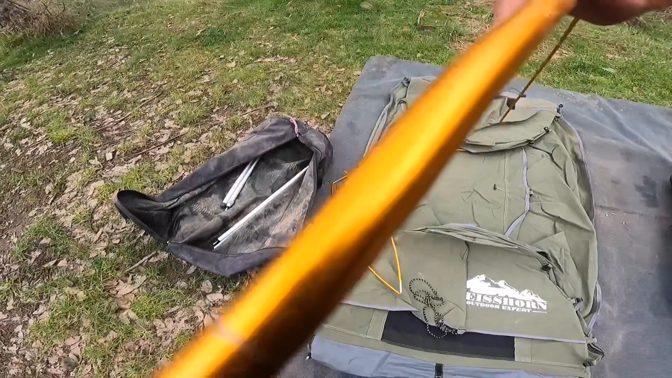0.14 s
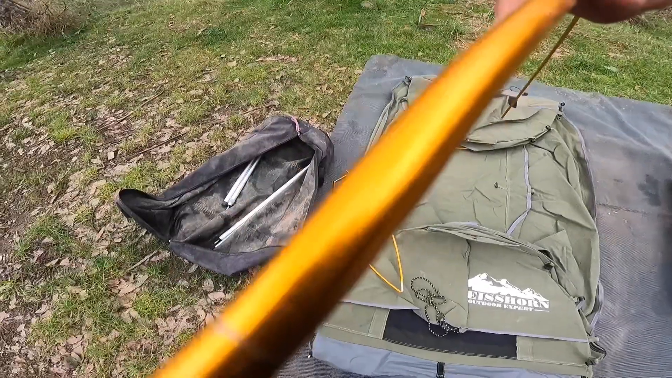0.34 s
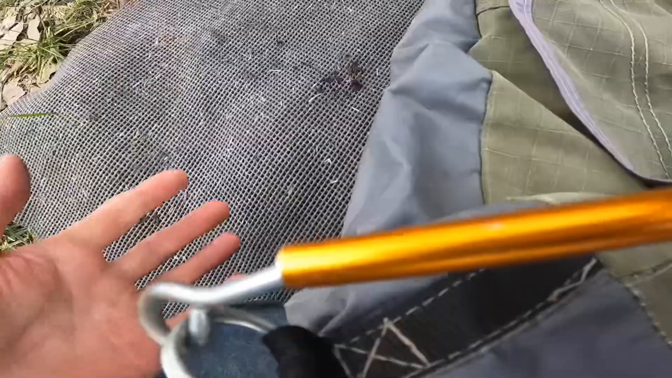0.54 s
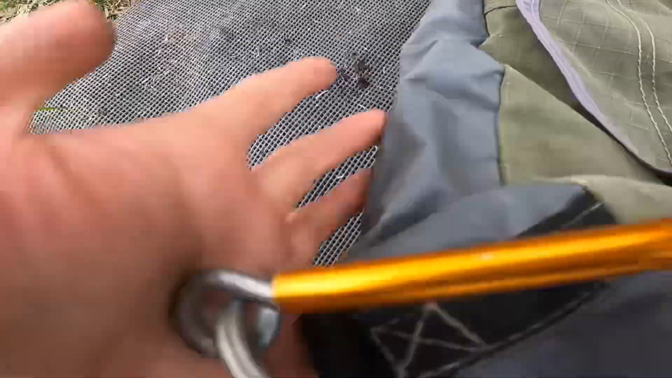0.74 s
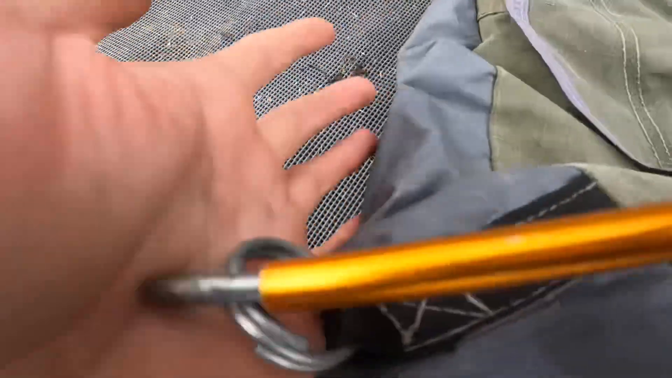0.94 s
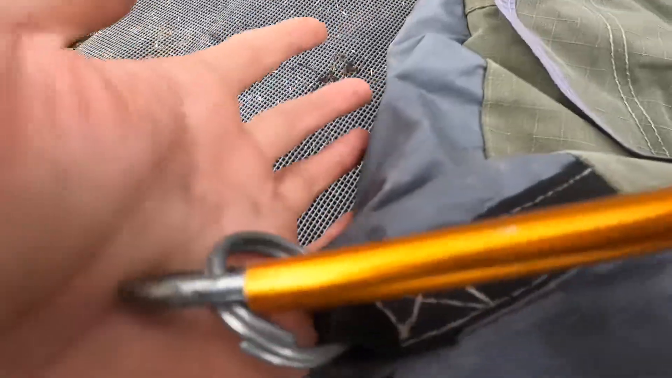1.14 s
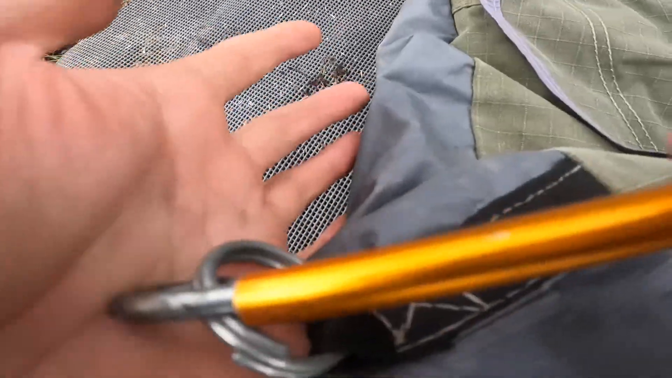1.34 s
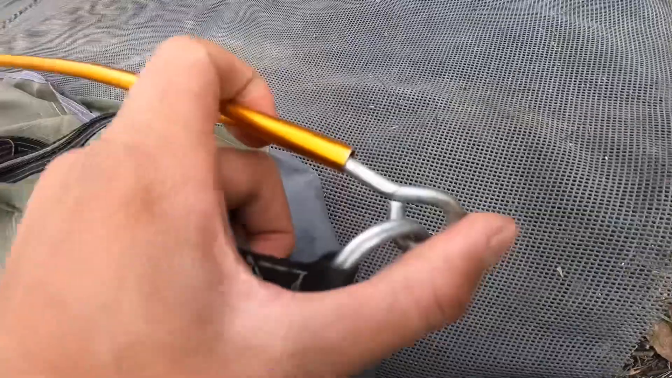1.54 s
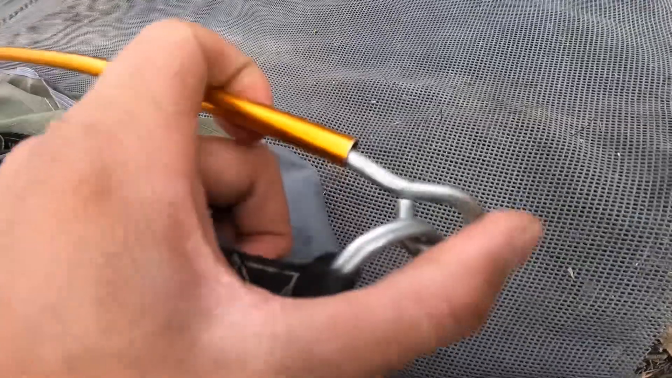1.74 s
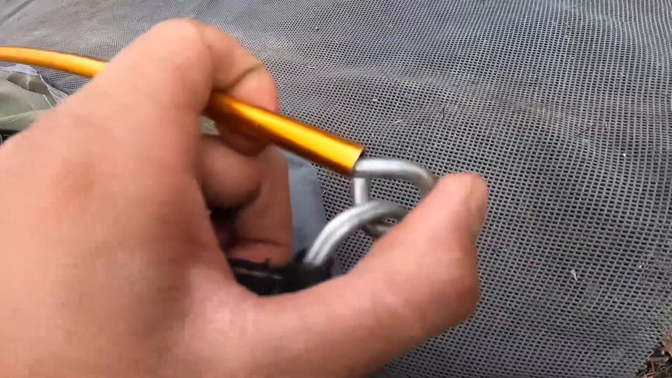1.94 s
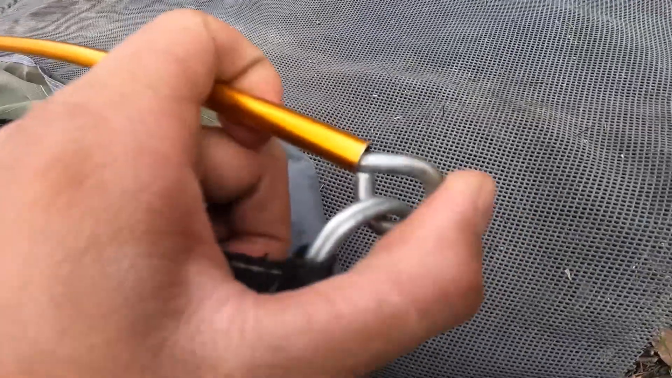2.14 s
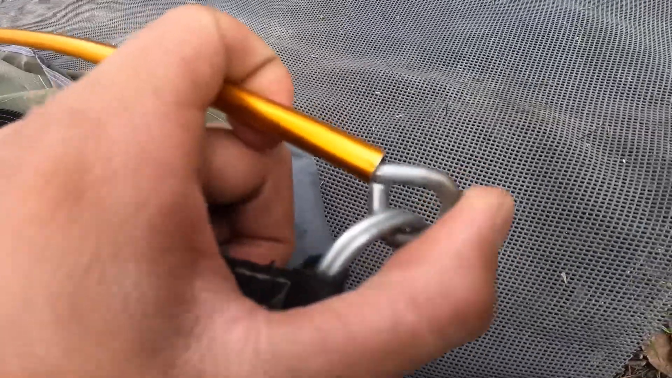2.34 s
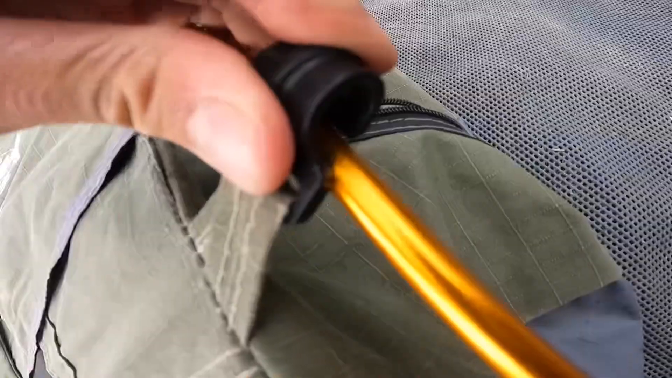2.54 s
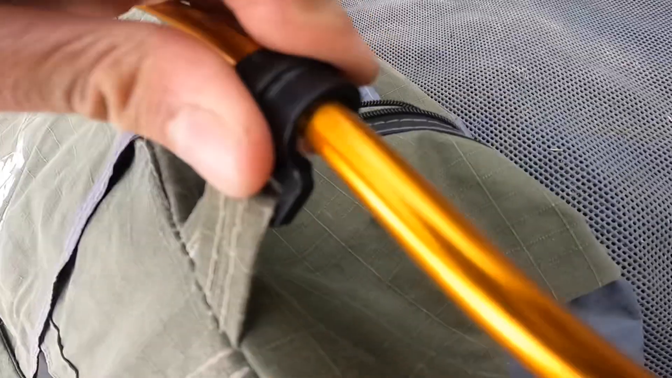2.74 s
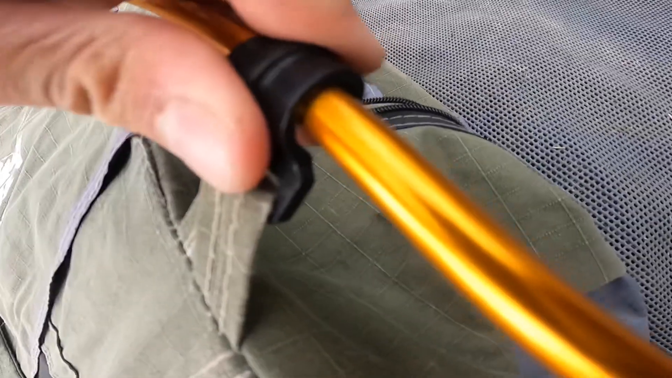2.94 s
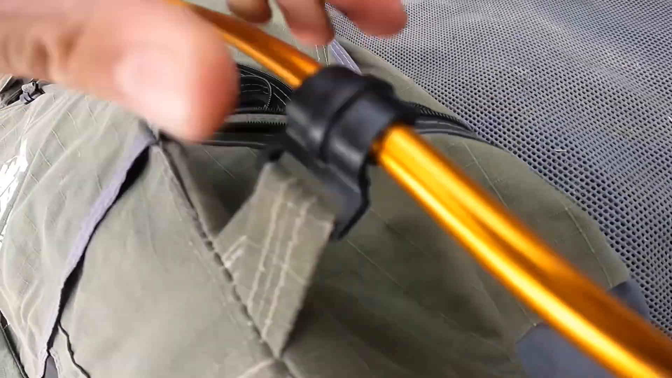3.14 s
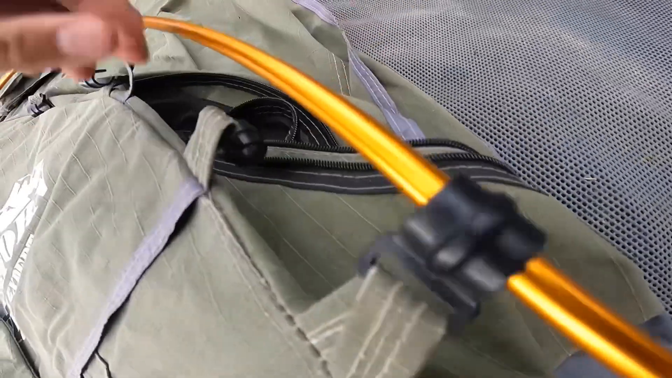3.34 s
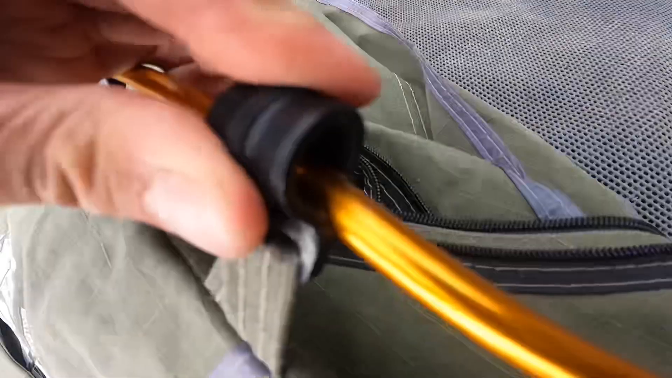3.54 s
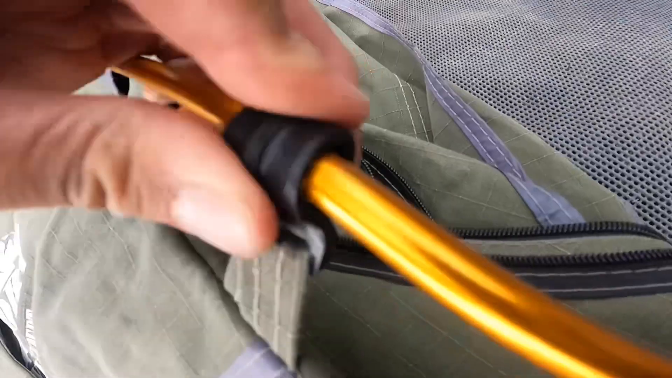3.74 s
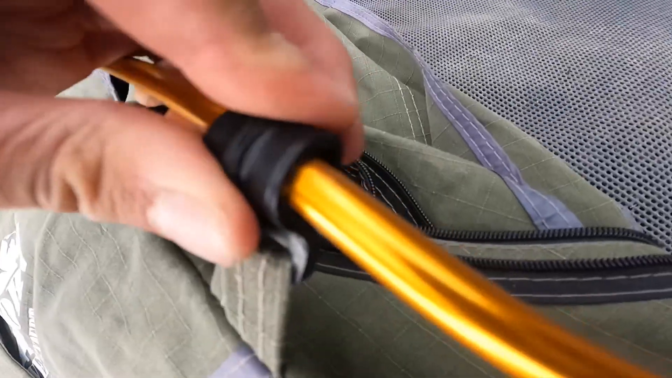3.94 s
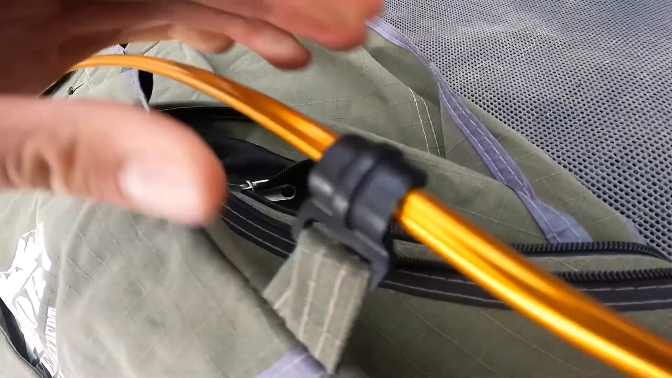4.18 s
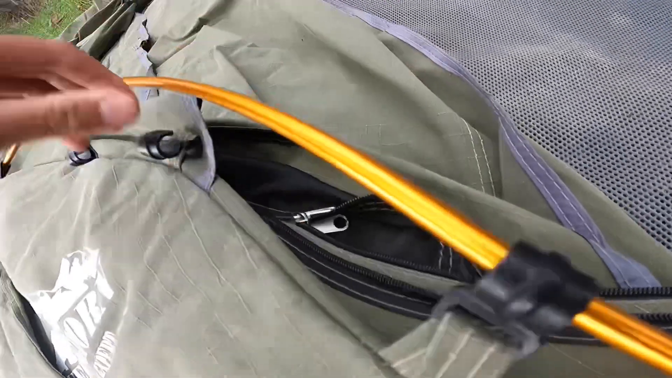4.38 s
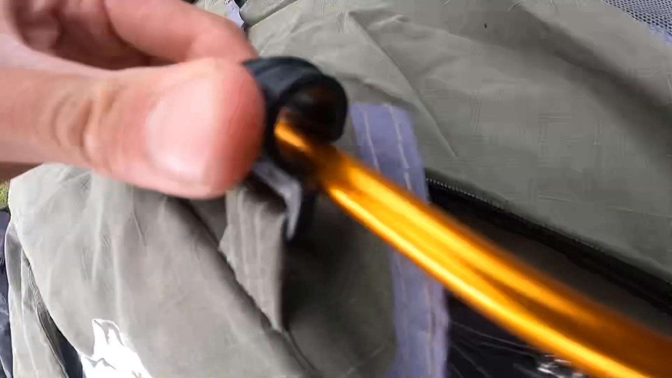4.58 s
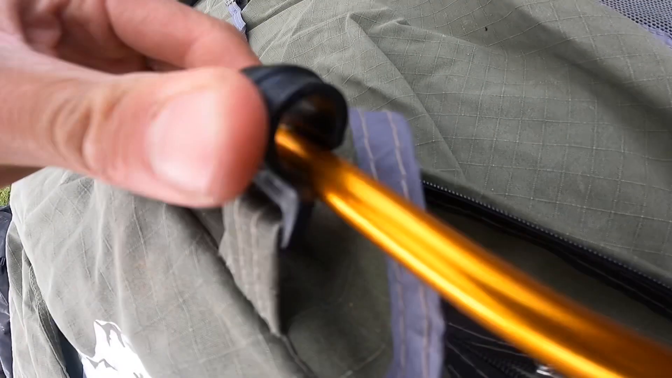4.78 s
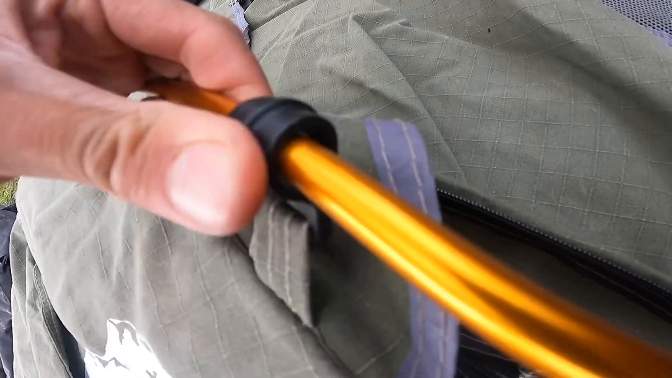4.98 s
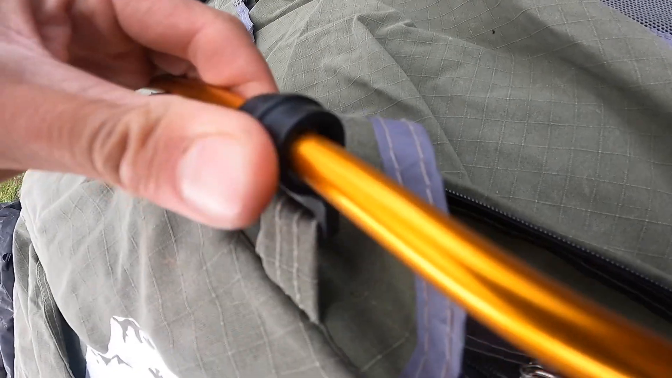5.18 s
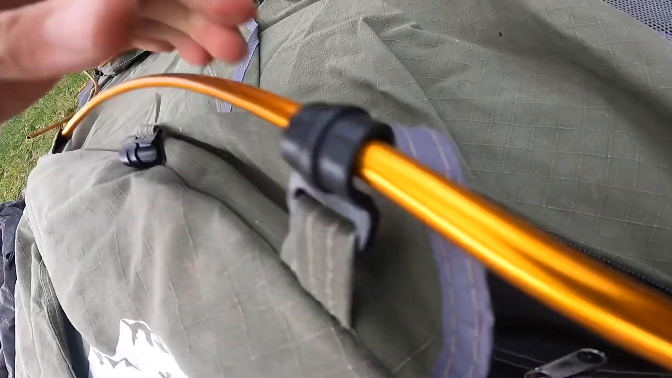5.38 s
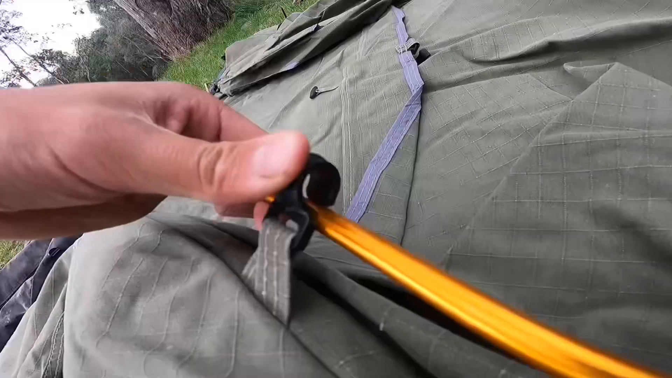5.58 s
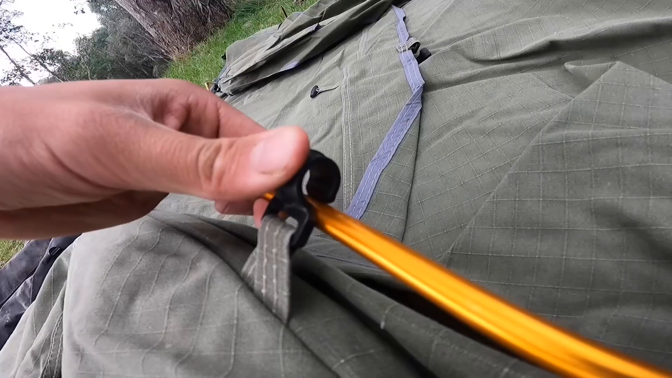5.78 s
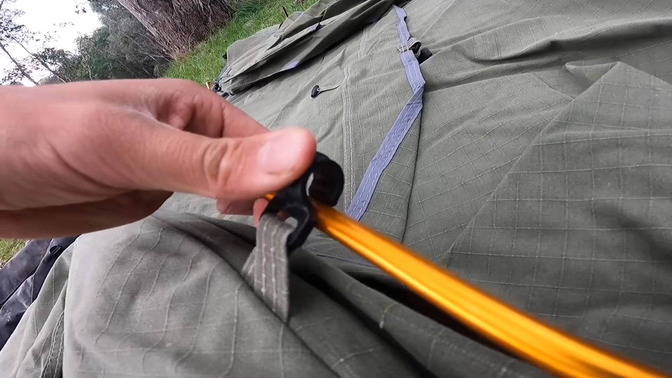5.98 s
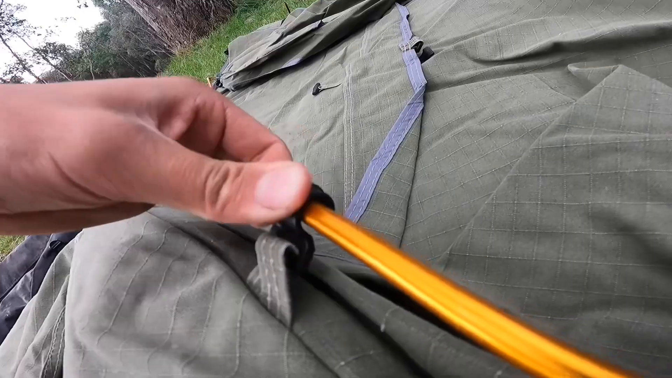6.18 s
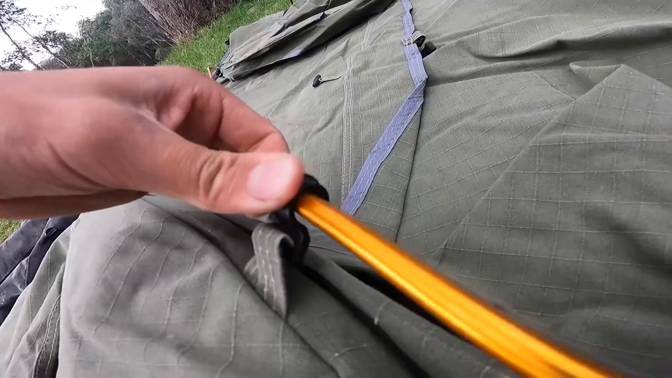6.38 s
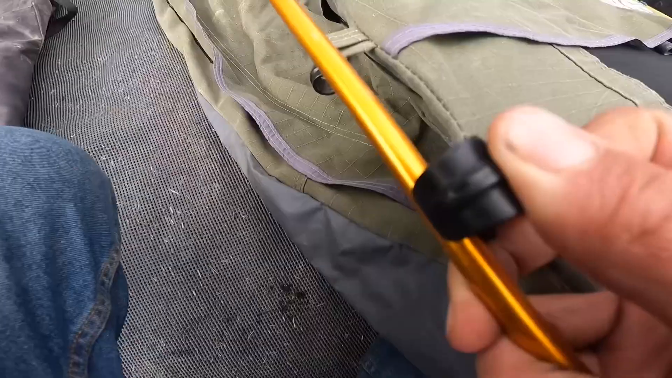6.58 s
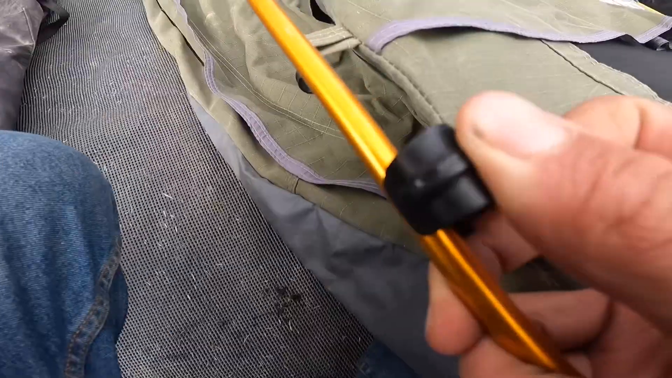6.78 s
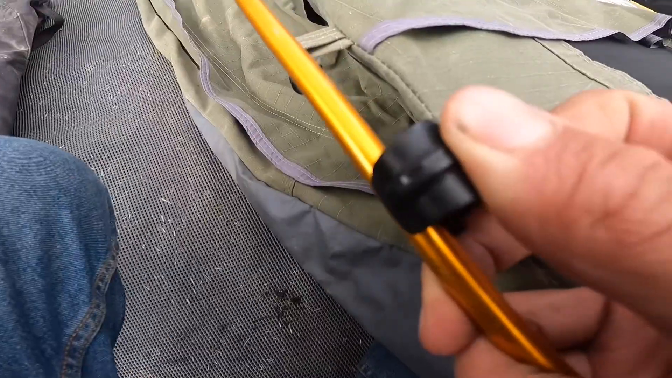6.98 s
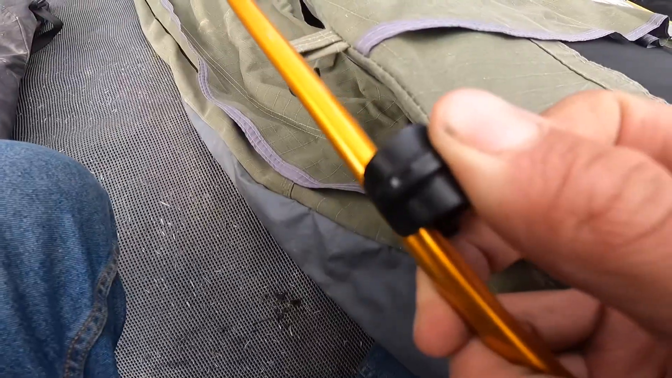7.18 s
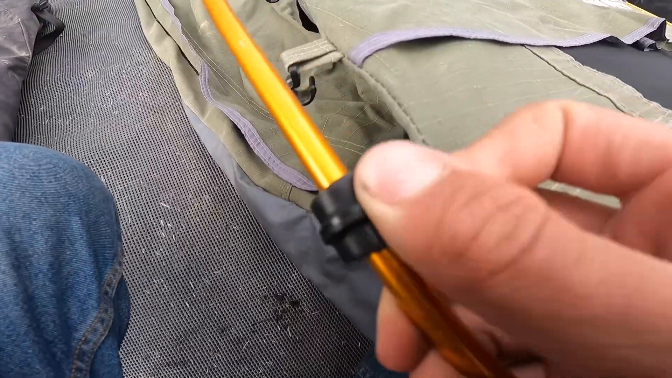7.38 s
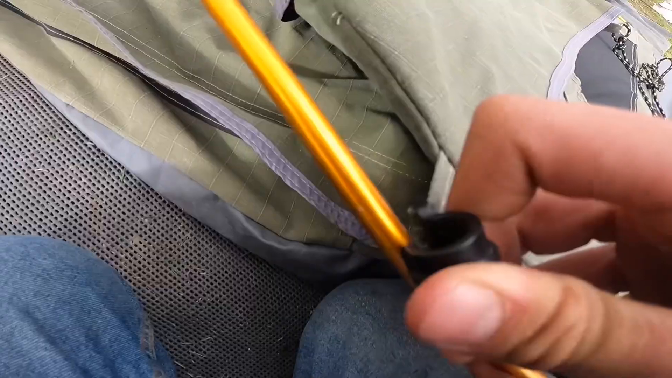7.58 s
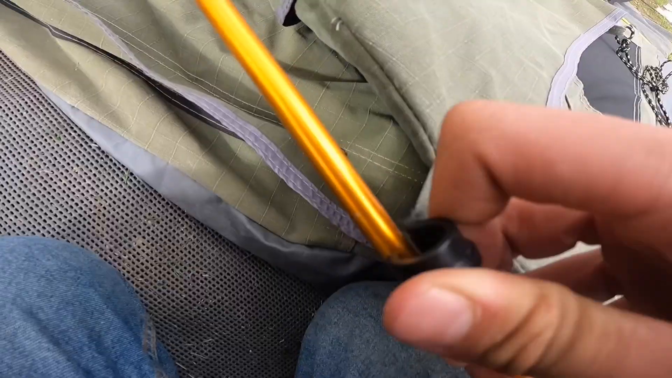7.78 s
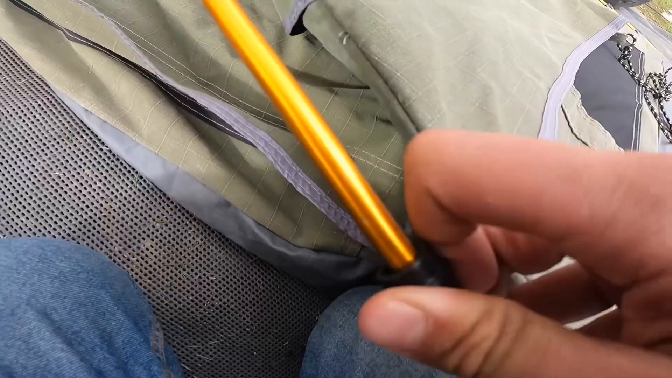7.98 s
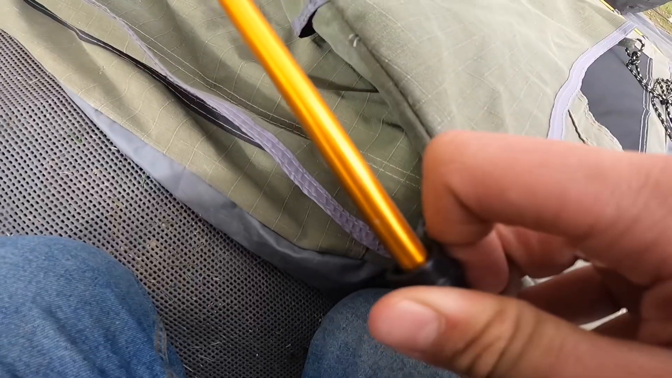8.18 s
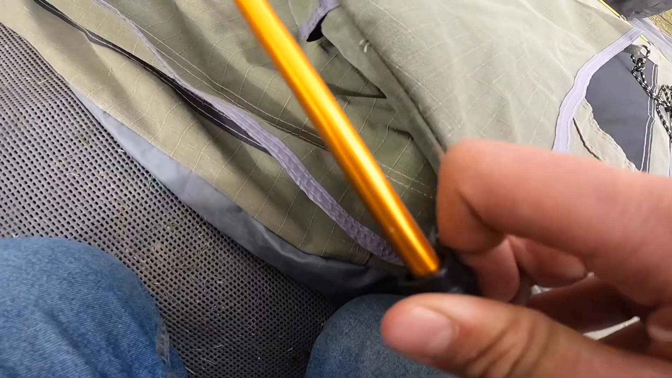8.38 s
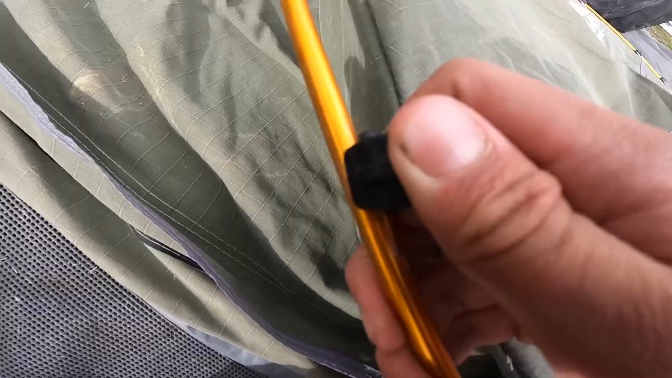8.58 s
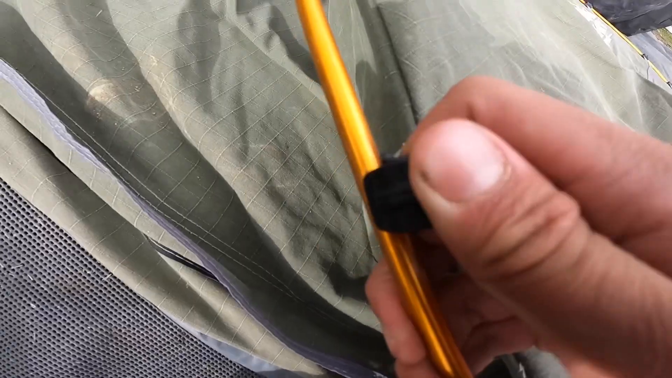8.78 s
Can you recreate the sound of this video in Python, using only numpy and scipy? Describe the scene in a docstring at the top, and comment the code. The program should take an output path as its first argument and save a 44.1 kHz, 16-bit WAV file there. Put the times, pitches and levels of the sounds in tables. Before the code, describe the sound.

Close, dry outdoor sound with a faint, soft hiss, its tone shifting at brief fades about every second. At 0 to 0.1 s a low, muffled bump of pole and canvas. Around 0.85 to 1.06 s a thump and sharp click, with a steel ring bouncing in tiny bright clinks, ending in a smaller click. At 1.98 s a moderate metallic click. At 2.84 s a duller snap with a canvas thud; at 3.86 s a harder, brighter plastic crack on hollow tube. At 4.99 s a very loud snap, followed by a weak tick at 5.46 s. At 6.30 s another extremely hard, short crack with a punchy thump, the background ducking for a moment. At 7.48 s a crisp, lighter snap, and at 8.01 s a click with a low thud and small rattle. Only hiss remains until the end at about 8.9 s.

```python
"""Pitching a tent on a lawn

Ten short passages close to the microphone, with a brief fade between them. Soft outdoor hiss is shaped noise.
The bowed pole thumps as decaying sines, the canvas as deep noise; a steel ring clinks on a pin as decaying modes.
Light taps and snaps of plastic hooks on the aluminium pole are noise bursts through tube resonances; noise swells
for a few milliseconds into each. The recorder's limiter ducks everything after the hardest snaps."""
import sys
import numpy as np
from scipy import signal
from scipy.fft import rfft, irfft
from scipy.io import wavfile
from scipy.ndimage import minimum_filter1d

SR = 44100
rng = np.random.default_rng(int(sys.argv[2]) if len(sys.argv) > 2 else 0)


def master_out(mix):
    """Clip the mix to full scale and print it as 16-bit PCM to the path in sys.argv[1]."""
    frames = np.transpose(np.atleast_2d(mix))
    ceiling = np.clip(frames, -1, 1)
    pcm = np.round(ceiling * 32767).astype(np.int16)
    wavfile.write(sys.argv[1], SR, pcm)


N = 388962
TIME = np.arange(N) / SR


def undb(db):
    """Decibels to gain."""
    return 10 ** (np.asarray(db) / 20)


def unit(x):
    """Scale to rms 1."""
    return x / np.sqrt(np.mean(x ** 2))


def bins_hz(size):
    """Frequencies of a real transform, kept off zero."""
    return np.maximum(np.arange(size // 2 + 1) * SR / size, 1)


def shape_db(points, hz):
    """A spectrum joined by straight lines on a log-frequency axis."""
    f, db = np.transpose(points)
    return np.interp(np.log(hz), np.log(f), db)


def hump(hz, centre_hz, octaves):
    """A broad resonance, 1 at its centre."""
    return 1 / (1 + (np.log2(hz / centre_hz) / octaves) ** 2)


def bass_shelf(hz, corner_hz):
    """1 well below the corner, 0 well above it."""
    return 1 / (1 + (hz / corner_hz) ** 4)


def rolloff_db(hz, corner_hz, depth_db):
    """Treble falls steeply above the corner, down to a shelf."""
    return 10 * np.log10(1 / (1 + (hz / corner_hz) ** 16) + undb(depth_db) ** 2)


def colour(x, db):
    """Causal minimum-phase filter shaped by the gain at each bin; keeps the energy of white noise."""
    cepstrum = irfft(np.log(unit(undb(db))))
    # fold the cepstrum onto positive time
    cepstrum[1:len(x) // 2] *= 2
    cepstrum[len(x) // 2 + 1:] = 0
    return irfft(rfft(x) * np.exp(rfft(cepstrum)))


def fade(t, t60_s):
    """Free decay, 60 dB down after t60."""
    return np.exp(-np.log(1000) * t / t60_s)


def add(out, start_s, sound, pan_db=0):
    """Mix a sound in at a time; pan is left minus right."""
    start = int(round(start_s * SR))
    sound = sound * undb(np.array([[pan_db], [-pan_db]]) / 2)
    first, last = max(start, 0), min(start + sound.shape[1], N)
    out[:, first:last] += sound[:, first - start:last - start]


# Passages. Each row: start in seconds, end in seconds, hiss in dB, its bass in dB, peak in Hz, hollow in Hz,
# change of the hiss after the passage's first snap in dB.
PASSAGES = [(-.05, .546, 3, -3.5, 2030, 730, 0), (.541, 1.526, 2.3, .5, 378, 2270, -5),
            (1.54, 2.521, -0.55, -1, 1004, 428, -1.2), (2.541, 3.523, -.5, 1, 710, 1660, -1),
            (3.542, 4.536, -0.76, 2.5, 656, 330, -3), (4.539, 5.519, 1, 0.5, 903, 330, -6),
            (5.54, 6.529, 1.2, -3.5, 5040, 316, -3), (6.539, 7.509, 2.5, -4, 1740, 2990, -4),
            (7.54, 8.54, 1.5, -2.5, 331, 2900, -3), (8.539, 8.9, 0.5, -3, 1300, 2900, 0)]
# Spectrum of outdoor air. Each row: frequency in Hz, relative density in dB per Hz.
AIR_SPECTRUM = [(25, -6), (70, -4.5), (120, -1.5), (175, 2), (260, -5.5), (400, -11), (650, -15),
                (1000, -15.5), (2500, -20.5), (4300, -23.5), (7500, -33.5), (12000, -35), (14000, -58),
                (16000, -68)]
# Spells of dull hiss. Each row: start in seconds, end in seconds, treble change in dB.
DULL_SPELLS = [(-.05, .546, -12), (1.006, 1.53, -10.5), (2.53, 3.53, -15.5)]
AIR_DB, AIR_PAN_DB = -43, 0.77
PEAK_DB, HOLLOW_DB, HISS_CORNER_HZ, SETTLE_S = 2.5, -3.5, 8270, 0.22


def air(bass_hz=170, side_db=-5, spread_hz=1000, flutter_db=0.92, treble_hz=4700, bright_db=1.5):
    """Outdoor hiss: noise coloured by the microphone's place, settling after a snap; bass nearly alike in both ears."""
    out, size = np.zeros((2, N)), 65536
    t, hz = np.arange(size) / SR, bins_hz(size)
    for start_s, end_s, db, bass_db, peak_hz, hollow_hz, settle_db in PASSAGES:
        # nearby ground and canvas lift one region and hollow out another
        place_db = PEAK_DB * hump(hz, peak_hz, 0.2) + HOLLOW_DB * hump(hz, hollow_hz, 0.17)
        ends_db = bass_db * bass_shelf(hz, bass_hz) + rolloff_db(hz, HISS_CORNER_HZ, -13)
        gain = unit(undb(shape_db(AIR_SPECTRUM, hz))) * undb(AIR_DB + db + place_db + ends_db)
        side_gain = gain * undb(side_db) * hz / (hz + spread_hz)
        mid = irfft(rfft(rng.standard_normal(size)) * gain)
        side = irfft(rfft(rng.standard_normal(size)) * side_gain)
        snap_s = min((s for s, *_ in SNAP_EVENTS if s > start_s), default=end_s)
        settled = np.clip((start_s + t - snap_s) / SETTLE_S, 0, 1)
        hiss = np.array([mid + side, mid - side]) * undb(settle_db * settled)
        add(out, start_s, hiss * (t < end_s - start_s), AIR_PAN_DB)
    treble_db = bright_db + sum(db * ((TIME > start_s) & (TIME < end_s)) for start_s, end_s, db in DULL_SPELLS)
    treble = signal.sosfiltfilt(signal.butter(6, treble_hz, "high", fs=SR, output="sos"), out)
    flutter = np.interp(TIME, np.linspace(0, TIME[-1], 128), rng.standard_normal(128))
    return (out + (undb(treble_db) - 1) * treble) * undb(flutter_db * flutter)


# Hands tug at the tent. Each row: start in seconds, recoil in dB, recoil in Hz, recoil t60 in seconds,
# canvas flap in dB.
TUG_EVENTS = [(0, -25, 46, .13, -22), (0.013, -7.5, 48, 0.069, -27.5), (.039, -20, 141, 0.16, -27),
              (.069, -15.5, 122, .063, -27.5), (.647, -19.5, 200, .02, -45), (.852, -6, 150, 0.083, -16.5),
              (0.93, -29, 70.8, .06, -25), (3.25, -50, 59, .1, -35.5), (4.299, -46, 45.8, .1, -35.5),
              (8.023, -8, 169, 0.028, -25.5)]
# Spectrum of flapping canvas. Each row: frequency in Hz, relative density in dB per Hz.
FLAP_SPECTRUM = [(12, -21.5), (34, -1), (70, 0.5), (130, -7), (260, -7.5), (450, -28.5), (1200, -55.5)]
# the harder the canvas flaps, the longer: t60 at 0 dB, and the drop in level that halves it
FLAP_T60_S, FLAP_HALVES_DB = 0.35, 50


def thumps(rise_s=0.00079, pan_db=-1.6, slow_hz=110, quick_share=.45, overtone=2.7, overtone_db=-13,
           side_db=-11):
    """After a snap or tug the bowed pole swings in two bending modes; the canvas flaps on, deepest folds longest."""
    out, t, hz = np.zeros((2, N)), np.arange(SR) / SR, bins_hz(SR)
    deep = signal.butter(2, slow_hz, fs=SR, output="sos")
    for start_s, *_, db, pitch_hz, t60_s, flap_db in SNAP_EVENTS + TUG_EVENTS:
        phase = 2 * np.pi * pitch_hz * t
        swing = np.sin(phase) * fade(t, t60_s)
        swing = swing + undb(overtone_db) * np.sin(overtone * phase) * fade(t, t60_s / 2)
        flap_t60_s = FLAP_T60_S * 2 ** (flap_db / FLAP_HALVES_DB)
        slow_fade = fade(t, flap_t60_s)
        cloth = np.array([colour(rng.standard_normal(SR), shape_db(FLAP_SPECTRUM, hz)) for _ in range(2)])
        folds = signal.sosfiltfilt(deep, cloth)
        flaps = folds * slow_fade + (cloth - folds) * fade(t, flap_t60_s * quick_share)
        mid, side = (unit(flap) * np.sqrt(np.mean(slow_fade ** 2)) for flap in flaps)
        canvas = mid + undb(side_db) * np.array([side, -side])
        thump = undb(db) * swing + undb(flap_db) * canvas
        add(out, start_s, thump * (1 - np.exp(-t / rise_s)), pan_db)
    return out


# Steel ring hits the pin. Each row: start in seconds, level in dB, upper modes in dB,
# ring length as a share of the free ring.
CLINK_EVENTS = [(.861, -26, -0.5, 0.88), (.872, -21, -0.5, 0.79), (.896, -29, -2.5, 1.6),
                (0.9163, -26.5, -5.5, 1.3), (.952, -20, 11.5, 0.44), (.9635, -20.5, -20, 1),
                (0.99, -25.5, -14, 0.34), (1.0578, -30, 11, 0.78)]
# Modes of steel ring and pin. Each row: frequency in Hz, level in dB, free t60 in seconds.
STEEL_MODES = [(3456, -20, .05), (4613, -18, .03), (6618, -1, .075), (6850, -7, .035), (7135, -3, .06),
               (10890, -21, .03)]


def clinks(tick_db=-5, tick_t60_s=0.0083, upper_hz=6900, pan_db=2.5):
    """The steel ring bounces on the pin: decaying modes, damped more or less by the palm, with a noise tick."""
    out, t = np.zeros((2, N)), np.arange(SR // 4) / SR
    tick_band = signal.butter(2, [5300, 8800], "band", fs=SR, output="sos")
    for start_s, db, upper_db, free in CLINK_EVENTS:
        ring = np.zeros(len(t))
        for hz, mode_db, t60_s in STEEL_MODES:
            gain = undb(mode_db + upper_db * (hz > upper_hz))
            struck_hz = hz * (1 + 0.00054 * rng.standard_normal())
            ring += gain * fade(t, t60_s * free) * np.sin(2 * np.pi * struck_hz * t)
        tick = unit(signal.sosfilt(tick_band, rng.standard_normal(len(t)))) * fade(t, tick_t60_s)
        add(out, start_s, undb(db) * (ring + undb(tick_db) * tick), pan_db)
    return out


def band_noise(force, db, even=0):
    """Grainy contact force through a body's spectrum; a clean break (even near 1) drives all pitches alike."""
    grains = rfft(force * rng.choice([-1, 1], len(force)))
    grains = irfft(grains / (abs(grains) + 1e-9) ** np.clip(even, 0, 1))
    return unit(colour(grains, db)) * np.sqrt(np.mean(force ** 2))


# Spectrum of plastic cracking on aluminium tube. Each row: frequency in Hz, relative density in dB per Hz.
CRACK_SPECTRUM = [(150, 0), (600, -10), (1800, -7), (2900, -1.5), (6500, -3), (8000, -5), (10500, -5),
                  (13000, -8), (16000, -21.5)]
# Resonances of hook and tube, heard in the swell and rattle around a hit. Each row: frequency in Hz,
# width in Hz, level in dB.
TUBE_MODES = [(650, 1400, -4), (1200, 2400, -11.5), (2410, 140, -0.5), (2970, 210, 0), (3640, 330, -2),
              (4210, 120, -2), (6890, 1500, -17), (7750, 190, -9), (11400, 2700, -17)]
SWELL_S, RATTLE_S = 0.0078, 0.0063


def contact(decay_s, body_db, ring_hz, ring_db, top_hz, swell_db, rattle_db, side_db=-12, lag_s=9e-6,
            body_hz=1500, wobble_db=3):
    """Resonant noise swells unevenly into a crack, then rattles away; returns lead-in seconds and sound."""
    size = 8192
    t, hz = (np.arange(size) - size // 4) / SR, bins_hz(size)
    tube_power = sum(undb(db) ** 2 / (1 + ((hz - f * f / hz) / width) ** 2) ** 2 for f, width, db in TUBE_MODES)
    tube_db = 10 * np.log10(tube_power)
    crack = (t >= 0) * np.exp(-abs(t) / decay_s)
    wobble = undb(wobble_db * np.interp(t, np.linspace(t[0], t[-1], 100), rng.standard_normal(100)))
    swell = undb(swell_db) * np.exp(-abs(t) / SWELL_S)
    rattle = undb(rattle_db) * np.exp(-abs(t) / RATTLE_S)
    around = wobble * np.where(t < 0, swell, rattle)
    top_db = rolloff_db(hz, top_hz, -21.5)
    tilt_db = body_db * bass_shelf(hz, body_hz) + ring_db * hump(hz, ring_hz, .25)
    crack_db = shape_db(CRACK_SPECTRUM, hz) + tilt_db + top_db
    around_db = tube_db + tilt_db / 2 + top_db
    mid, side = (band_noise(crack, crack_db, even=0.42) + band_noise(around, around_db) for _ in range(2))
    # the hands work nearer the right port, so the left hears them a little later
    late = irfft(rfft(mid) * np.exp(-2j * np.pi * hz * lag_s))
    return -t[0], np.array([late + undb(side_db) * side, mid - undb(side_db) * side])


# Light taps on the tube, and the bright treble edge of one snap. Each row: start in seconds, level in dB,
# decay in seconds, low body in dB, resonance in Hz, resonance in dB.
TAP_EVENTS = [(.07, -38, .002, 8, 3300, 19), (0.8518, -20, 0.0036, 12, 1600, 16.5),
              (0.861, -19, 0.0071, 15, 3400, -4.5), (0.8792, -24.5, .006, -0.5, 3390, -0.5),
              (.8959, -27.5, 0.0031, 7.5, 1187, 13), (0.9591, -23.5, .006, -1.5, 3400, -0.5),
              (2.8346, -19, 0.0023, -20, 13560, 32), (3.8657, -8, 0.0019, 4.5, 7100, 15.5),
              (3.885, -26.5, 0.0041, -6, 3420, 16.5), (5.003, -15.5, 0.0017, 4.5, 4600, 4.5),
              (6.317, -26, 0.0011, -15, 3160, 6.5), (7.951, -33.5, .0012, -6.5, 4240, 10),
              (8.0254, -20, 0.0027, -1.5, 3600, 4), (8.066, -37, .0025, 1.5, 3500, 15)]
# swell and rattle are relative to the tap, the bounce to the first hit
TAP_SWELL_DB, TAP_RATTLE_DB, TAP_CORNER_HZ, BOUNCE_S, BOUNCE_DB = -22.5, -15, 10600, 0.015, -19.5


def taps(pan_db=1):
    """Light taps on the tube and one snap's treble edge, each bouncing once; each hit with a little swell and rattle."""
    out = np.zeros((2, N))
    for start_s, db, decay_s, body_db, ring_hz, ring_db in TAP_EVENTS:
        for delay_s, loss_db in ((0, 0), (BOUNCE_S, BOUNCE_DB)):
            lead_s, sound = contact(decay_s, body_db, ring_hz, ring_db, TAP_CORNER_HZ, TAP_SWELL_DB,
                                    TAP_RATTLE_DB)
            add(out, start_s + delay_s - lead_s, undb(db + loss_db) * sound, pan_db)
    return out


# Pin or hook snaps home and jolts the pole. Each row: start in seconds, level in dB, low body in dB,
# resonance in Hz, resonance in dB, treble corner in Hz, swell in dB, left minus right in dB,
# recoil in dB, recoil in Hz, recoil t60 in seconds, canvas flap in dB.
SNAP_EVENTS = [(0.8713, -3, 8.5, 3120, 2.5, 12500, -28, -2.5, -7, 69, .07, -27),
               (1.0579, -16, 4, 3220, 7, 8550, -42, -2.5, -19.5, 70, .046, -35),
               (1.9848, -10, 1, 6580, 11.5, 10510, -30.5, 1.5, -15, 105, .045, -28.5),
               (2.8353, -9, -2.5, 4720, 7.5, 5280, -15.5, 0.5, -6.5, 114.3, 0.069, -16),
               (3.8615, 1, 4, 3610, 7.5, 13000, -19.5, -3.5, -1.5, 84, 0.073, -13),
               (4.9931, 13.5, -0.5, 6200, 5.5, 11600, -24, 2.5, 1.5, 80, .035, -11.5),
               (5.4603, -16.5, 1, 3740, 2.5, 7100, -55, -1.5, -27, 100, 0.018, -35),
               (6.2978, 12.5, -5, 5950, 8, 11160, -35, -1.5, 8, 179, 0.04, -12),
               (7.48, -1.5, 5, 5220, 7.5, 11000, -29.5, -0.2, -6, 90.2, 0.016, -23),
               (8.013, 1, -3, 4900, 4.5, 10900, -30, -2, -2, 55, 0.068, -13.5)]
# a harder snap is shorter: decay at 0 dB, and the rise in level that halves it
CRACK_S, CRACK_HALVES_DB = .0014, 33
# a louder swell leaves more rattle: rattle at 0 dB swell, and its slope in dB per dB
RATTLE_DB, RATTLE_PER_SWELL = -19.5, .35


def snaps():
    """Pin and hooks crack home, the harder the shorter; noise swells for a few milliseconds into each snap."""
    out = np.zeros((2, N))
    for start_s, db, body_db, ring_hz, ring_db, top_hz, swell_db, pan_db, *_ in SNAP_EVENTS:
        decay_s = CRACK_S * 2 ** (-db / CRACK_HALVES_DB)
        rattle_db = RATTLE_DB + RATTLE_PER_SWELL * swell_db
        # contact() takes swell and rattle relative to the crack
        lead_s, sound = contact(decay_s, body_db, ring_hz, ring_db, top_hz, swell_db - db, rattle_db - db)
        add(out, start_s - lead_s, undb(db) * sound, pan_db)
    return out


def passage_fades(fade_in_s=0.044, fade_out_s=0.023):
    """Gain that opens at the start of each passage and closes at its end."""
    gain = np.zeros(N)
    for start_s, end_s, *_ in PASSAGES:
        ramp = np.minimum((TIME - start_s) / fade_in_s, (end_s - TIME) / fade_out_s)
        gain += np.sin(np.pi / 2 * np.clip(ramp, 0, 1)) ** 2
    return gain


def scene():
    """Air, canvas, ring, taps and hooks, passage by passage."""
    return (air() + thumps() + clinks() + taps() + snaps()) * passage_fades()


CEILING, HOLD_S, RELEASE_S = 0.93, 0.079, 0.068


def limiter(x, overshoot_db=2):
    """Peaks beyond ceiling plus overshoot duck the gain at once; it holds, then recovers; the rest clips."""
    over_db = np.maximum(20 * np.log10(abs(x).max(axis=0) / CEILING + 1e-9) - overshoot_db, 1e-6)
    hold = 2 * int(HOLD_S * SR / 2) + 1
    held_db = -minimum_filter1d(-over_db, hold, origin=hold // 2)
    # the duck in dB shrinks exponentially until a larger one takes over
    duck_db = np.exp(np.maximum.accumulate(np.log(held_db) + TIME / RELEASE_S) - TIME / RELEASE_S)
    return np.clip(x * undb(-duck_db), -CEILING, CEILING)


TOP_HZ = 16200


def record(dry):
    """The recorder limits the snaps and cuts the top."""
    top_cut = signal.ellip(8, .2, 70, TOP_HZ, fs=SR, output="sos")
    return signal.sosfilt(top_cut, limiter(dry))


dry = scene()
out = record(dry)
master_out(out)
```